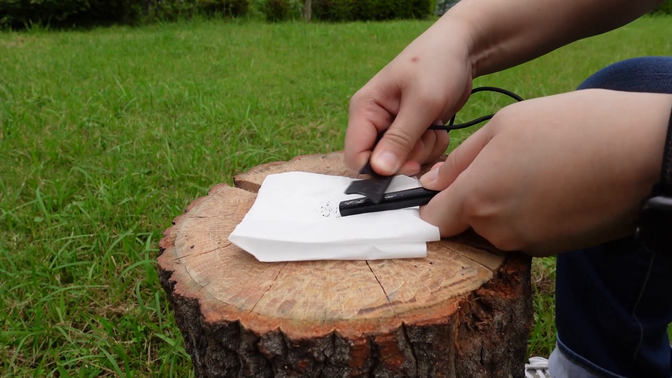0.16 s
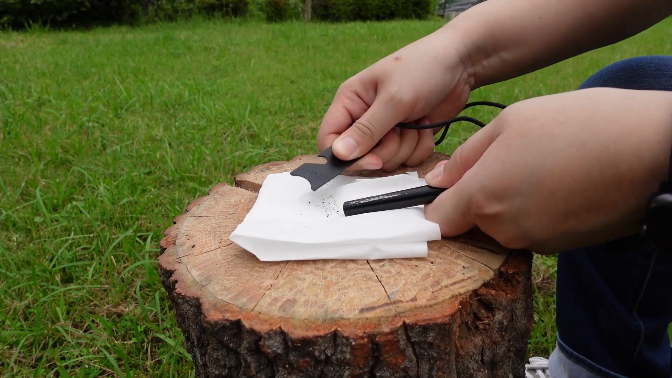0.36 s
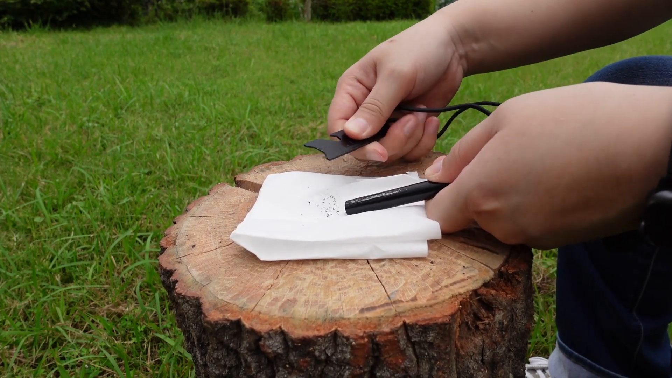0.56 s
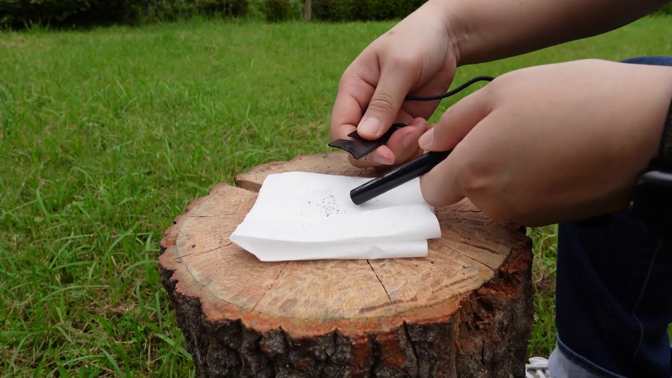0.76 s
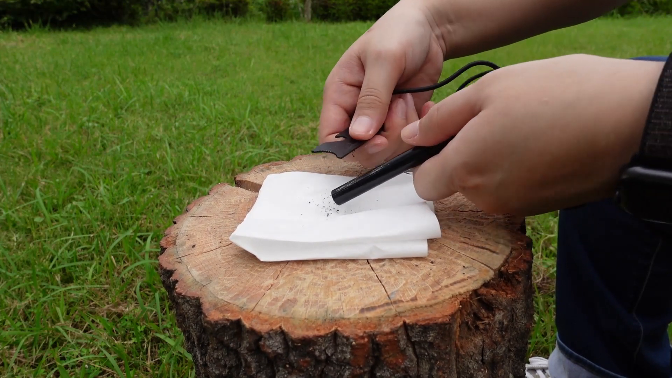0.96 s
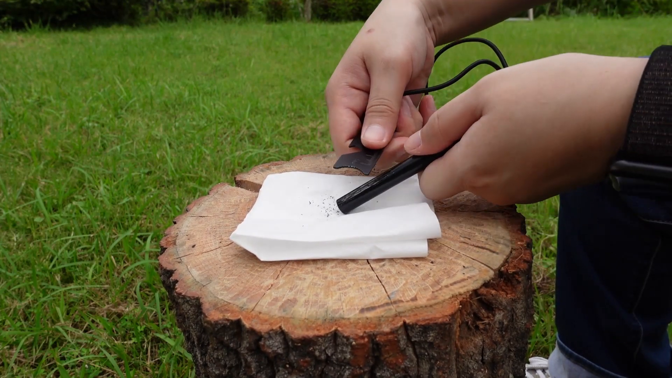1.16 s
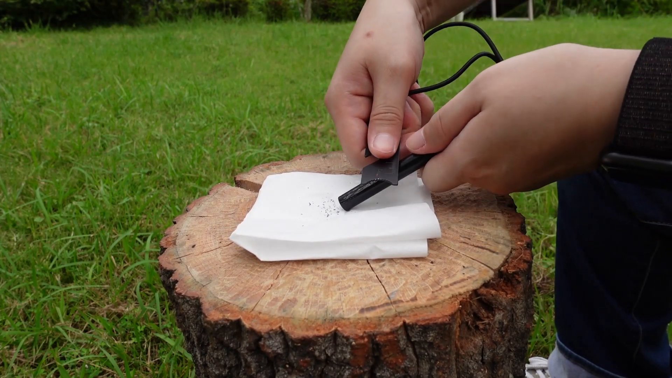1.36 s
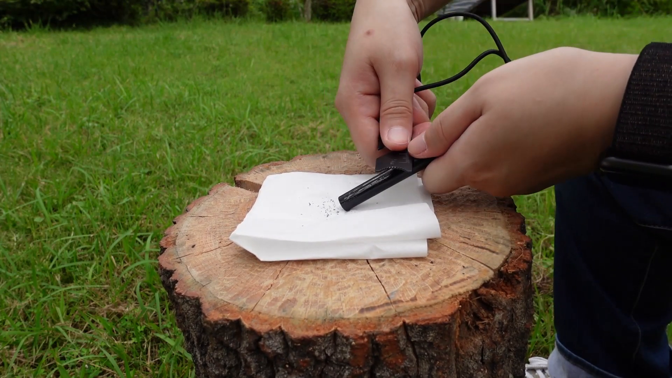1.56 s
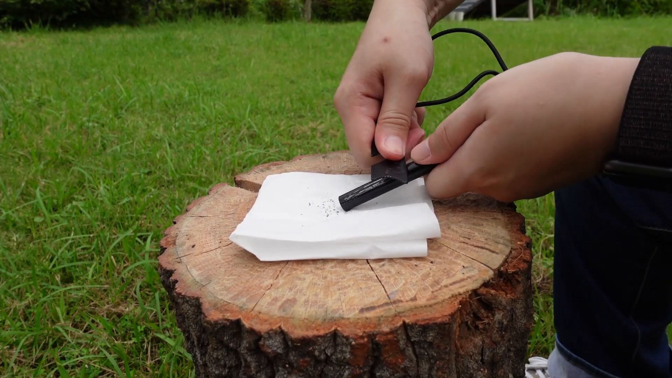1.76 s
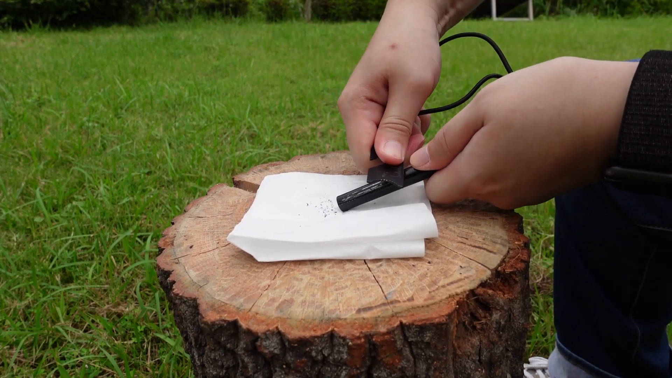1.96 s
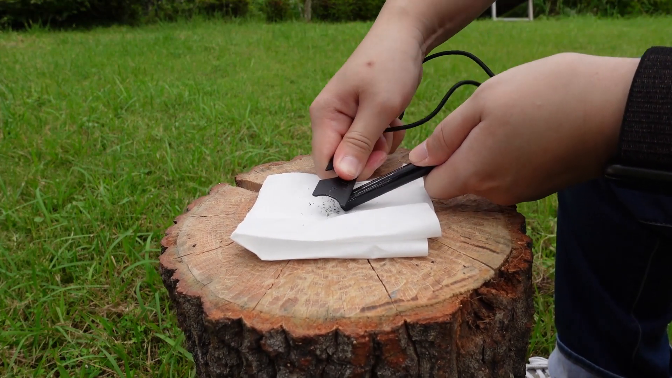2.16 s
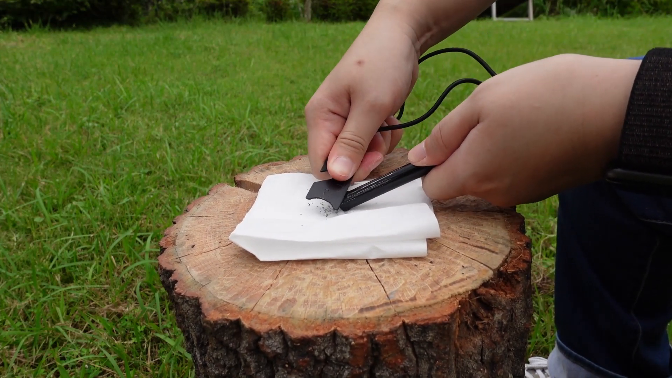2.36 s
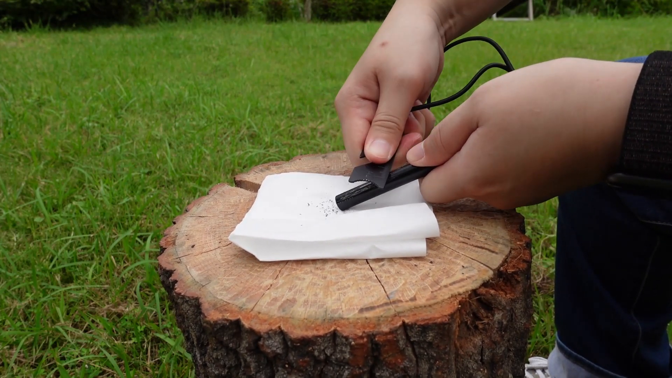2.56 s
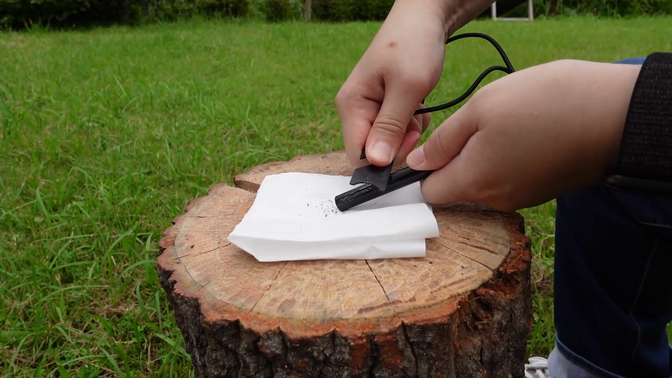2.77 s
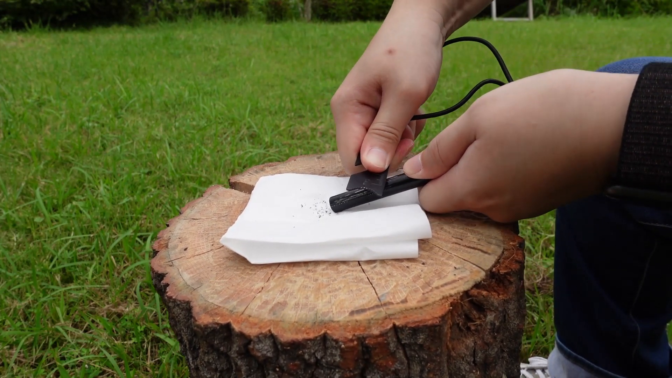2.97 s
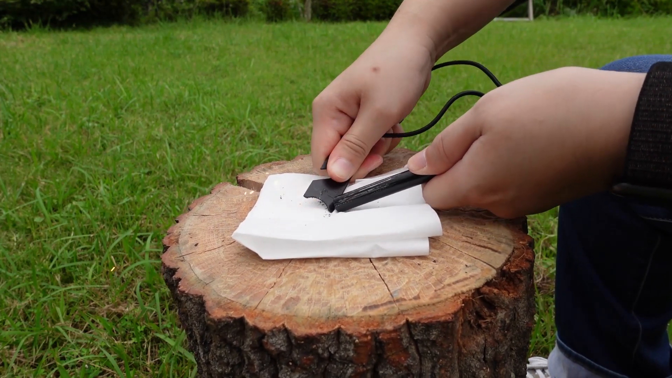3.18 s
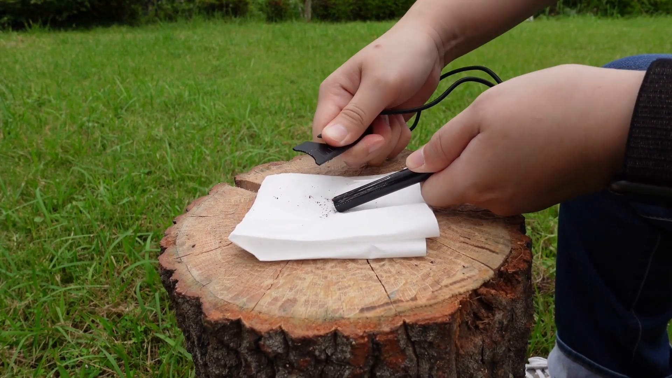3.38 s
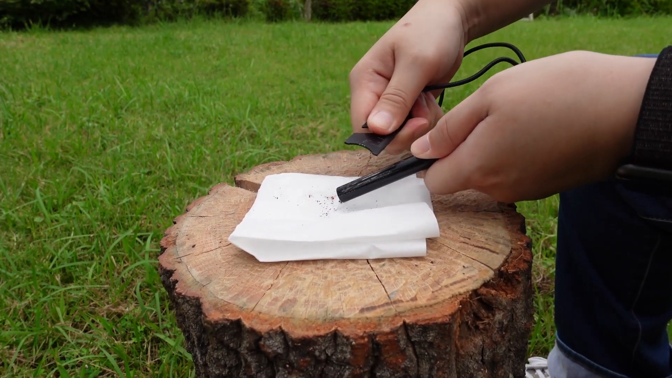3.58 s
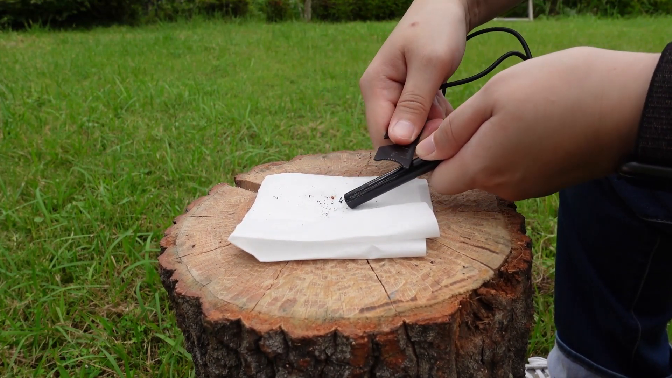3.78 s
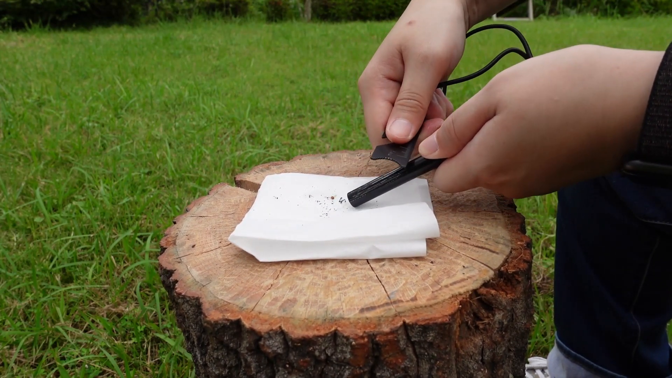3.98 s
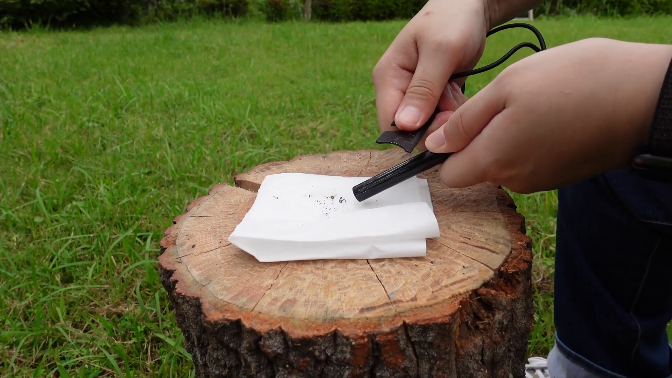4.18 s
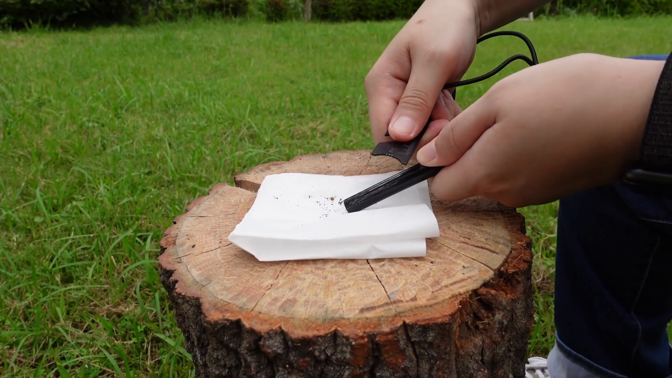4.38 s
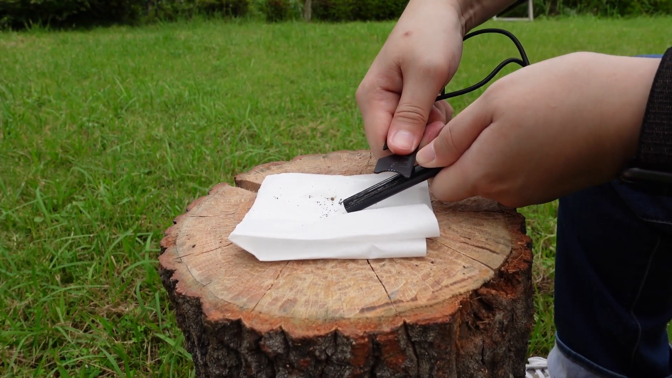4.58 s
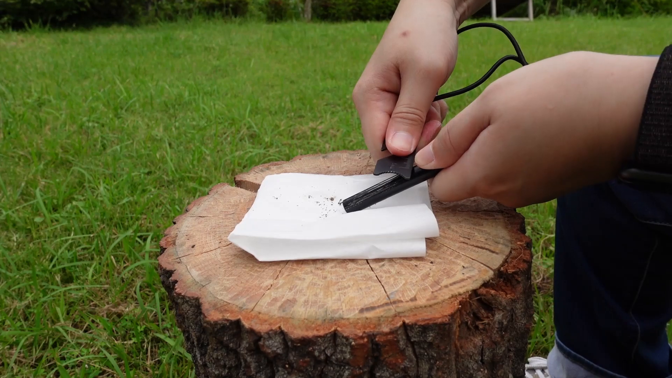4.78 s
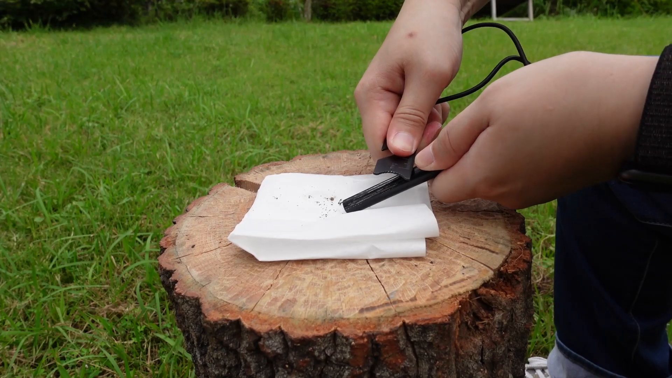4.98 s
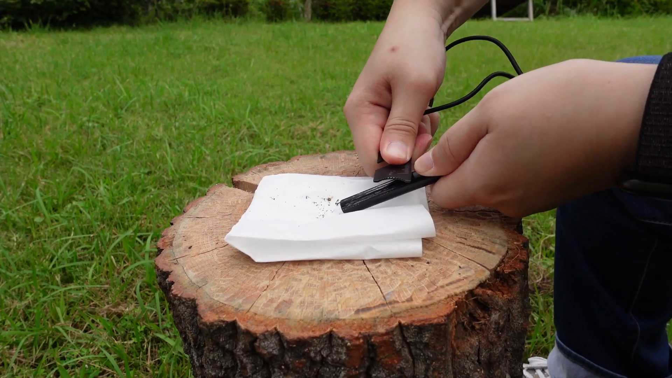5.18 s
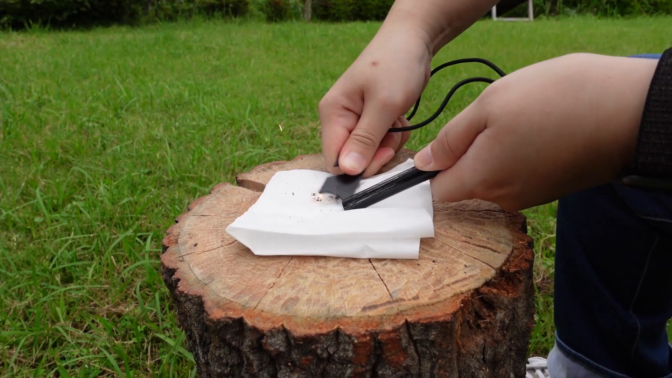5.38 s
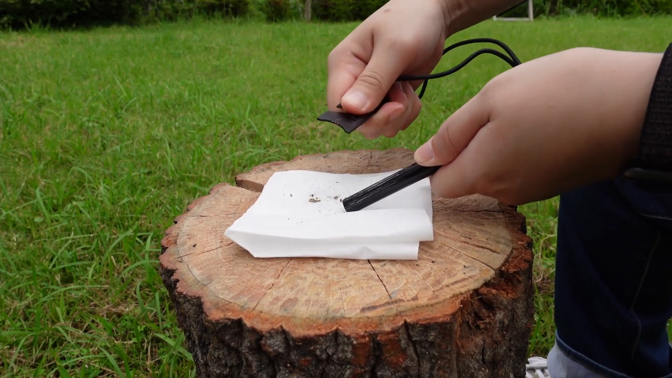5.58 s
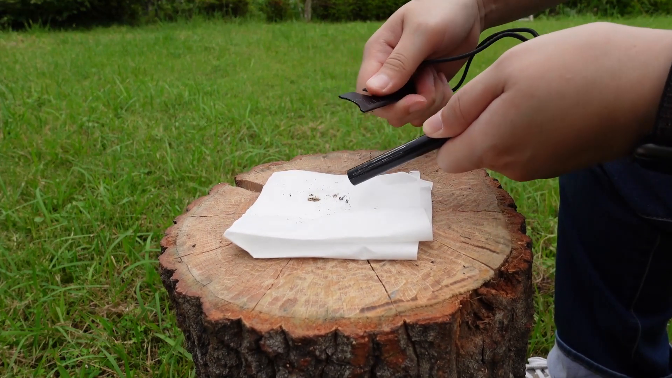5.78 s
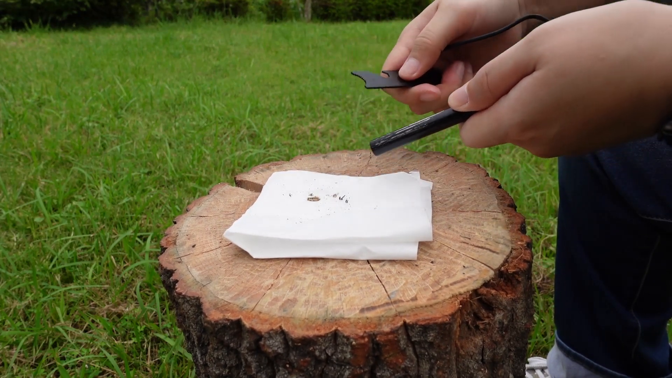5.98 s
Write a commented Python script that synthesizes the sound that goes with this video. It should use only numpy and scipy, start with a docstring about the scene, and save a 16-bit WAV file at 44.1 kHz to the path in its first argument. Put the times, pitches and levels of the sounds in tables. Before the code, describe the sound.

In an open meadow, a thin high insect drone and soft far car roar run throughout. Small birds chip at the start and again late. Near the microphone, a striker chatters brightly down a rod, pauses, clicks, scrapes in short raspy bites, crunches folded paper, taps lightly and scrapes once more. A tree stump under the paper gives soft, dull knocks. No room echo, only slight scatter from trees.

```python
"""A summer meadow: far cars, cicadas, crickets, a low hum and a buzzing katydid are there from the start.
Small birds call within the first moments; then a steel striker chatters down a fire-starter rod,
rings and taps it, crumples the paper under it and knocks the tree stump. Slower scrapes follow from 1.5 s,
light taps from 3.6 s, more bird calls from 4.4 s while the hum's octave swells, and last scrapes at 5.2 s.
Noise and uneven clicks through resonances make most of it; sliding tones make bird calls and near cricket."""
import sys
import numpy as np
from scipy import signal
from scipy.fft import rfft, irfft
from scipy.io import wavfile
from scipy.ndimage import uniform_filter1d

SR = 44100
rng = np.random.default_rng(int(sys.argv[2]) if len(sys.argv) > 2 else 0)


def generate_wav(sig):
    """Save sig (samples, or channels by samples) to the path in sys.argv[1] as 16-bit PCM at SR."""
    pcm = np.round(np.clip(np.atleast_2d(sig).T, -1, 1) * 32767).astype(np.int16)
    wavfile.write(sys.argv[1], SR, pcm)


N = 266184   # length in samples
T = np.arange(N) / SR


def amp(db):
    """Decibels to gain."""
    return 10 ** (np.asarray(db) / 20)


def rms_one(x):
    """Scale to an average strength (rms) of 1."""
    return x / np.sqrt(np.mean(x ** 2) + 1e-20)


def panned(x, db):
    """Two channels, the left louder than the right by db."""
    return np.array([x * amp(db / 2), x * amp(-db / 2)])


def drift(rate):
    """Slow random wandering with spread 1, made of straight lines between 2 * rate random points a second."""
    knots = np.arange(0, T[-1] + 1, .5 / rate)
    return rms_one(np.interp(T, knots, rng.standard_normal(len(knots))))


def swell(middle, length):
    """Rise and fall as half a cosine around a moment."""
    return np.cos(np.pi * np.clip((T - middle) / length, -.5, .5))


def curves(tables):
    """Draw the columns of several timed tables along the time axis, with a gate open only inside the tables."""
    s, *columns = np.transpose(np.vstack(tables))
    gate = 0
    for rows in tables:
        to_nearest_end = np.minimum(T - rows[0][0], rows[-1][0] - T)
        gate = gate + np.clip(to_nearest_end * 1000, 0, 1)   # opens and closes in 1 ms
    return gate, [np.interp(T, s, c) for c in columns]


def gestures(rows, rise_db):
    """Draw pushes of the hand: the gate, the level below the peak, the peak level and the other columns."""
    tables = []
    for start, rise, fall, peak_db, fade_db, *rest in rows:
        top = start + rise
        tables.append([(start, -rise_db, peak_db, *rest),
                       (top, 0, peak_db, *rest),
                       (top + fall, -fade_db, peak_db, *rest)])
    return curves(tables)


def resonate(x, hz, width_hz):
    """Ring at one pitch, as a two-pole filter with gain 1 on top; a narrow width rings longer."""
    r = np.exp(-np.pi * width_hz / SR)
    feedback = [1, -2 * r * np.cos(2 * np.pi * hz / SR), r * r]
    return signal.lfilter([(1 - r * r) / 2, 0, (r * r - 1) / 2], feedback, x + 1e-18)


def coloured(x, spectrum):
    """Shape by a (Hz, dB) spectrum with a minimum-phase filter, so that nothing sounds early."""
    hz = np.maximum(np.arange(2049) * SR / 4096, 10)
    points_hz, points_db = np.transpose(spectrum)
    log_gain = np.log(amp(np.interp(np.log(hz), np.log(points_hz), points_db)))
    cepstrum = irfft(log_gain)
    # folding the second half onto the first gives minimum phase
    cepstrum[1:2048] *= 2
    cepstrum[2049:] = 0
    impulse = irfft(np.exp(rfft(cepstrum)))
    return signal.oaconvolve(np.atleast_2d(x), impulse[None], axes=1)[:, :np.shape(x)[-1]]


def grains(per_s, spread_db):
    """Random clicks of uneven size; rms 1."""
    sizes = amp(spread_db * np.minimum(rng.exponential(1, N), 5)) * rng.choice([-1, 1], N)
    return rms_one(sizes * (rng.random(N) < per_s / SR))


# how alike left and right are: pitch_hz, likeness (0-1)
LEFT_RIGHT_LIKENESS = [(30, 0.92), (130, 0.81), (300, 0.36), (700, 0.06), (1500, 0.58), (3000, 0.5),
                       (7000, 0.23), (15000, .4)]


def wide_noise(spectrum):
    """Noise from all round, its left and right alike by a different amount at each pitch; rms 1."""
    hz, alike = np.transpose(LEFT_RIGHT_LIKENESS)
    mid, side = coloured(rng.standard_normal((2, N)), spectrum)
    mid = coloured(mid, np.transpose([hz, 10 * np.log10(1 + alike)]))[0]
    side = coloured(side, np.transpose([hz, 10 * np.log10(1 - alike)]))[0]
    return rms_one(np.array([mid + side, mid - side]))


def chorus(modes, alike, flutter_db, flutter_rate):
    """Blurred tones: fluttering noise twice through each of several resonances; rms 1."""
    mid, side = rng.standard_normal((2, N))
    noise = np.array([mid + (1 - alike) * side, mid - (1 - alike) * side])
    noise = noise * amp(flutter_db * drift(flutter_rate))
    total = 0
    for k, (hz, width_hz, db) in enumerate(modes):
        band = resonate(resonate(noise, hz, width_hz), hz, width_hz)
        total = total + amp(db) * band * (-1) ** k
    return rms_one(total)


# far cars going by: nearest_s, level_db there, passing_s (distance over speed), left_minus_right_db
CARS = [(.88, -47, 0.31, -3), (2.6, -57.5, 0.42, -1.5), (4.0, -61.5, 0.22, 3), (5.35, -59, 0.44, 4)]
# colour of the tyre roar: pitch_hz, level_db (per Hz)
TYRE_COLOUR = [(100, -27), (250, -55), (450, -14), (800, -8.5), (1200, 2), (1900, 2), (2400, -5),
               (3500, -8), (5000, -21.5), (8000, -61)]


def cars():
    """Tyre roar swells and fades with the distance of each car; the powers of the cars add up."""
    power = 0
    for nearest_s, db, passing_s, pan_db in CARS:
        distance = np.hypot(1, (T - nearest_s) / passing_s)   # 1 at the nearest point
        power = power + panned(amp(db) / distance, pan_db) ** 2
    return np.sqrt(power) * wide_noise(TYRE_COLOUR)


# loudness of the engine rumble over time: time_s, level_db
RUMBLE_LEVEL = [(0.0, -65), (3.1, -69), (4.7, -77.5), (6.04, -71)]
# colour of the engine rumble: pitch_hz, level_db (per Hz)
RUMBLE_COLOUR = [(40, -13), (100, -6), (250, -0.5), (400, -3), (700, -40)]


def engine_rumble():
    """Engine rumble of far traffic: low noise whose level follows a curve."""
    gate, (level_db,) = curves([RUMBLE_LEVEL])
    return amp(level_db) * wide_noise(RUMBLE_COLOUR)


# colour of far traffic and leaves: pitch_hz, level_db (per Hz)
MEADOW_COLOUR = [(25, -34), (60, -16.5), (150, -10.5), (400, -12.5), (700, -5.5), (1100, -4.5), (1800, -27),
                 (2500, -28.5), (4400, -16.5), (5500, -14), (7500, -22.5), (9800, -40), (11600, -22),
                 (14000, -27.5), (16000, -42)]


def meadow():
    """Far traffic and leaves as one steady bed of wide noise."""
    return amp(-62) * wide_noise(MEADOW_COLOUR)


# bands of the cicadas' song: pitch_hz, width_hz (of each filter pass), level_db (before balancing)
CICADA_BANDS = [(6463, 400, 5.5), (6858, 310, -1), (6270, 210, -4.5)]
# loudness of the cicadas over time: time_s, level_db
CICADA_LEVEL = [(0, -55.5), (6.04, -57.5)]


def cicadas():
    """A drone of many cicadas: lightly fluttering noise in narrow bands."""
    gate, (level_db,) = curves([CICADA_LEVEL])
    return amp(level_db) * chorus(CICADA_BANDS, alike=0.36, flutter_db=1.0, flutter_rate=25)


CRICKET_RATE_HZ, CRICKET_START_CYCLES = 35.7, .43   # wing beats a second; how far into a beat it starts
CRICKET_DB = -60.5   # the near cricket
# bands of the farther crickets: pitch_hz, width_hz (of each filter pass), level_db (before balancing)
FAR_CRICKET_BANDS = [(8470, 1170, -13.5), (8883, 550, -6.5)]


def crickets():
    """Each cycle has a strong and a weak wing stroke, tones that slide down; far ones blur into noise."""
    cycle = CRICKET_RATE_HZ * T + CRICKET_START_CYCLES
    strokes = 0
    # start and length as shares of a cycle, top pitch in Hz, level in dB before balancing
    for lag, length, top_hz, db in [(0, .46, 8882, 19), (.52, 0.33, 9070, -7)]:
        x = (cycle - lag) % 1 / length   # 0 to 1 within the stroke
        hz = top_hz - 550 * x
        tone = np.sin(2 * np.pi * np.cumsum(hz * (x < 1)) / SR)
        shape = np.sin(np.pi * np.minimum(x, 1)) ** 0.56
        strokes = strokes + amp(db + drift(23)) * shape * tone
    near = panned(rms_one(strokes), 2.7)
    far = amp(-0.5) * chorus(FAR_CRICKET_BANDS, alike=0.58, flutter_db=3.0, flutter_rate=74)
    return amp(CRICKET_DB) * (near + far)


HUM_PAN = amp([[-8], [3]])   # dB left, right
# the low hum: pitch_hz, width_hz (of each filter pass), level_db (before balancing)
HUM_BAND = [(621.7, 68, 0)]


def hum():
    """A low wavering hum on the right: noise in one narrow band."""
    return amp(-62) * HUM_PAN * chorus(HUM_BAND, alike=0.067, flutter_db=1.5, flutter_rate=14)


# bands of the katydid's buzz: pitch_hz, width_hz (of each filter pass), level_db (before balancing)
KATYDID_BANDS = [(11370, 660, 5), (12200, 460, -20), (11920, 900, 6)]
# single buzzes: middle_s, level_db
BUZZES = [(0.106, -68), (.37, -72), (0.622, -72), (1.003, -70), (1.23, -69), (1.469, -71), (1.721, -72),
          (1.965, -73), (2.222, -71), (2.422, -72), (2.636, -68), (2.91, -70), (3.377, -66), (3.68, -69),
          (4.08, -68.5), (4.307, -66), (4.56, -70), (5.102, -72), (5.5, -72), (5.783, -69), (5.99, -68)]
BUZZ_S, KATYDID_PULSE_HZ = 0.15, 50.5


def katydid():
    """Faint buzzes, three or four a second, of high noise pulsing about fifty times a second."""
    buzzes = sum(amp(db) * swell(middle_s, BUZZ_S) for middle_s, db in BUZZES)
    pulse = 1 + 0.24 * np.sin(2 * np.pi * KATYDID_PULSE_HZ * T)
    noise = chorus(KATYDID_BANDS, alike=.4, flutter_db=3.0, flutter_rate=100)
    return buzzes * pulse * noise * amp([[-1.2], [1.2]])


# sharp bird chips that drop onto a note: start_s, peak_db, note_hz
CHIPS = [(.033, -46.5, 9520), (0.13, -37, 8220), (4.759, -42.5, 9700), (4.861, -31.5, 8330),
         (4.994, -32.5, 8200)]
CHIP_DROP_HZ, CHIP_DROP_S = 2700, 0.00083   # starts this far above the note; falls by e in this time
CHIP_RING_S = 0.006   # loudest after half of this


def bird_chips():
    """A quick drop in pitch onto a rough note, with a short swell and fade."""
    chips, rasp = 0, np.cumsum(150 * drift(600)) / SR   # the pitch shakes by 150 Hz
    for start_s, peak_db, note_hz in CHIPS:
        age = np.maximum(T - start_s, 0)
        drop = CHIP_DROP_HZ * CHIP_DROP_S * np.exp(-age / CHIP_DROP_S)
        tone = np.sin(2 * np.pi * (note_hz * age - drop + rasp))
        shape = 2 * (age / CHIP_RING_S) * np.exp(1 - 2 * age / CHIP_RING_S)
        chips = chips + amp(peak_db) * tone * shape
    return panned(chips, 0.34)


# bird whistles: level_db, tremble_hz (spread of the shaking pitch), pitch curve as points of (time_s, pitch_hz)
WHISTLES = [(-57, 100, [(.035, 3600), (.06, 5000), (.085, 5700)]), (-59, 80, [(.13, 5200), (.155, 3300)]),
            (-66, 67, [(.95, 4400), (.975, 4500), (.995, 4000)]), (-60, 41, [(1.015, 4100), (1.03, 4500),
            (1.045, 4000)]), (-57, 27, [(1.668, 5300), (1.675, 4700), (1.705, 4850), (1.718, 4080),
            (1.74, 4050), (1.752, 4750), (1.775, 4800)]), (-57.5, 40, [(1.893, 5500), (1.918, 3950),
            (1.926, 4250), (1.938, 3900), (1.968, 3650)]), (-62.5, 33, [(4.415, 3400), (4.46, 3750),
            (4.48, 3300)]), (-61, 120, [(4.692, 3400), (4.705, 4700), (4.725, 5100)]),
            (-69, 250, [(4.728, 5100), (4.75, 5300), (4.78, 5000)]), (-64, 110, [(4.783, 5000),
            (4.81, 3700)])]
WHISTLE_EDGE_S = .006   # softens starts and ends


def bird_whistles():
    """Gliding tones along a drawn pitch curve, with a trembling pitch and level."""
    tables = [[(*point, db, tremble_hz) for point in pitch] for db, tremble_hz, pitch in WHISTLES]
    gate, (hz, db, tremble_hz) = curves(tables)
    soft_gate = uniform_filter1d(gate, size=round(WHISTLE_EDGE_S * SR))
    tone = np.sin(2 * np.pi * np.cumsum(hz + tremble_hz * drift(700)) / SR)
    return panned(np.sqrt(2) * soft_gate * amp(db + 1.6 * drift(150)) * tone, 0.44)


TREE_ECHO_DB, TREE_ECHO_S = -3, .022   # the echoes fall by e in this time


def birds():
    """Rough chips and trembling whistles, smeared by scattered echoes from the trees."""
    calls = bird_chips() + bird_whistles()
    fade = np.exp(-np.arange(6000) / SR / TREE_ECHO_S)
    trees = rng.standard_normal((2, 6000)) * fade / np.sqrt(TREE_ECHO_S * SR / 2)
    return calls + amp(TREE_ECHO_DB) * signal.oaconvolve(calls, trees, axes=1)[:, :N]


# what rod and striker ring with: pitch_hz, width_hz (before each use reshapes it), level_db (taps use half)
MODES = [(780, 180, 6), (1626, 210, 16.5), (2770, 840, -18), (3067, 200, 3.5), (3300, 91, -11.5),
         (3780, 960, -9), (4065, 330, -4.5), (4780, 97, -5), (4430, 380, 1.5), (4775, 246, -2),
         (5580, 350, 0.5), (5850, 184, 3.5), (5992, 87, -2), (6270, 170, 6), (6320, 660, 11),
         (8580, 740, -2.5)]


def near_chatter(hz, chatter_hz, spread):
    """Modes near the chatter rate of the edge and its octave are driven hardest; far ones keep a small share."""
    first = -6 * (np.log2(hz / chatter_hz) / spread) ** 2
    octave = -12 - 6 * (np.log2(hz / chatter_hz / 2) / 0.18) ** 2
    return amp(np.maximum(np.maximum(first, octave), -36))


# strokes of the edge along the rod, one row per bite: start_s, rise_s, fall_s, ring_db,
# fade_db (over the fall; negative grows), chatter_hz, spread_octaves, grit_db
STROKES = [(0.203, 0.0041, 0.0095, -15.5, 5.5, 6300, 0.24, -51),
           (0.216, .001, 0.014, -26, -4, 5800, 0.15, -52),
           (0.227, 0.0081, 0.00867, -23, -1, 6060, .18, -48),
           (0.243, 0.0071, 0.0066, -18, 18, 6200, 0.26, -43),
           (0.255, 0.0063, 0.0036, -21.5, 9, 6300, .22, -47),
           (0.266, .004, 0.0062, -19.5, 11, 5860, 0.16, -47),
           (0.276, 0.0025, 0.0068, -20, 10, 6100, 0.19, -48), (0.288, .005, .006, -23, 28, 6050, .23, -40),
           (1.515, 0.019, 0.028, -50, 1, 3620, 0.2, -82), (1.77, .012, .023, -34, 25, 4180, 0.2, -54),
           (2.139, .028, .031, -18.5, 3.5, 4295, 0.34, -35),
           (2.199, 0.00058, 0.032, -34, 23, 4160, .38, -48),
           (2.325, 0.007, 0.038, -50.5, 11, 3480, 0.54, -67),
           (2.579, 0.0008, 0.043, -29, 26, 3870, 0.24, -56),
           (3.069, 0.0058, 0.0331, -21, 2.5, 4500, 0.31, -36.5),
           (3.115, .001, 0.0069, -21, 24, 3160, 0.49, -41),
           (3.123, 0.00087, 0.065, -36.5, 9, 3600, 0.26, -58),
           (5.24, 0.007, 0.018, -24.5, 0.5, 5030, 0.34, -34.5),
           (5.266, 0.0011, 0.019, -21.5, 3, 5180, 0.48, -30.5),
           (5.339, 0.0067, .005, -27, 17, 3600, 0.27, -54), (5.436, .002, 0.01, -25, 2, 3620, 0.48, -53)]
BITE_RISE_DB = 12   # a bite swells by this much
# colour of the torn-off grit: pitch_hz, level_db (per Hz)
GRIT_COLOUR = [(1000, -17.5), (4000, 1), (6500, 0), (8700, 10.5), (10300, -1), (12500, 3.5), (14300, -2),
               (15200, -2), (16000, -45)]


def scrape():
    """Dense uneven slips drive the modes of the steel; torn-off grit adds a bright hiss."""
    gate, columns = gestures(STROKES, BITE_RISE_DB)
    live = uniform_filter1d(gate, size=3001) > 1e-6   # only the strokes and their short tails
    shape_db, ring_db, chatter_hz, spread, grit_db = (c[live] for c in columns)
    slips = (grains(9000, spread_db=2.2) * amp(1.8 * drift(300)) * gate)[live]
    rings, power = 0, 0
    leans = rng.standard_normal(len(MODES))   # each mode beams its own way
    for k, ((hz, width_hz, db), lean) in enumerate(zip(MODES, leans)):
        gain = amp(db) * near_chatter(hz, chatter_hz, spread)
        # the second, wider filter steepens the skirts
        ring = resonate(resonate(slips, hz, width_hz), hz, 2.36 * width_hz)
        ring = ring * np.sqrt(SR / np.pi / width_hz)   # evens out narrow and wide modes
        rings = rings + panned(gain * ring * (-1) ** k, -3 + 4.3 * lean)
        power = power + gain ** 2
    hiss = 0.54 * gate[live] * rng.standard_normal((2, live.sum()))
    grit = coloured(slips + hiss, GRIT_COLOUR)
    out = np.zeros((2, N))
    out[:, live] = amp(shape_db) * (amp(ring_db) * rings / np.sqrt(power) + amp(grit_db) * grit)
    return out


# folds of the paper snapping: start_s, peak_db (before panning), pitch_hz
SNAPS = [(0.294, -29, 1850), (0.306, -46, 1770), (3.138, -23, 2660), (3.172, -23, 1700),
         (3.187, -27.5, 1160), (3.19, -22, 1680), (3.206, -21.5, 1520), (3.214, -28, 2680),
         (3.244, -30, 3500), (3.254, -31, 2560), (3.27, -32.5, 3220), (3.29, -36, 3280), (3.338, -46, 1270),
         (5.301, -27, 2770), (5.31, -25, 2820), (5.316, -26, 2860), (5.326, -28, 3080), (5.354, -30, 2800),
         (5.3705, -16, 2610), (5.384, -35, 2970), (5.397, -17, 1120), (5.405, -39, 1670)]
SNAP_S, SNAP_TREBLE_DB = 0.0011, -44   # all fall by e in this time and aim at this treble


def snaps():
    """A short noise burst where a fold gives; all have like treble, so big folds mainly add body."""
    out, t = np.zeros(N), np.arange(1500) / SR
    for start_s, peak_db, hz in SNAPS:
        burst = rng.standard_normal(1500) * np.exp(-t / SNAP_S) * np.minimum(t / 0.0003, 1)
        treble_db = SNAP_TREBLE_DB - peak_db
        colour = [(60, -60), (250, -27), (hz / 2, -10), (hz, 0), (hz * 2.24, -8),
                  (9000, treble_db), (16000, treble_db - 20)]
        snap = coloured(burst, colour)[0]
        at = round(start_s * SR)
        out[at:at + len(t)] += amp(peak_db) * snap / np.abs(snap).max()
    return out


# paper crumpling under the rod's tip, one row per push: start_s, rise_s, fall_s, level_db,
# fade_db (over the fall; negative grows), brightness_db
PAPER = [(.24, 0.0011, 0.038, -54, -3, 6.5), (.287, .007, 0.024, -50, 19, 5),
         (.313, .001, 0.14, -67.5, 2, 12), (2.14, 0.0067, 0.074, -50.5, 0.5, 5),
         (3.09, 0.0049, 0.052, -35.5, 1, 1.5), (3.139, .001, .04, -36.5, 10.5, 3),
         (3.18, 0.0056, 0.034, -41.5, -1.5, -4), (3.226, .001, 0.57, -48.5, 32, -1),
         (5.263, 0.0022, 0.0257, -41.5, 3, 4.5), (5.289, .001, 0.046, -44.5, 3, 6),
         (5.336, 0.039, 0.0226, -37.5, 3.5, 4), (5.393, 0.0041, 0.013, -39, 11, 7),
         (5.411, .001, 0.053, -48, 2, -4)]
PUSH_RISE_DB = 13.5   # a push swells by this much
# colour of the rustle: pitch_hz, level_db (per Hz)
PAPER_COLOUR = [(60, -50), (250, -9), (500, -6), (1100, 3.5), (1700, 4), (3000, -0.5), (6000, -2.5),
                (10000, -11.5), (15000, -21)]


def paper():
    """A dense rustle of clicks and noise from the folded paper, with louder snaps where a fold gives."""
    gate, (shape_db, level_db, bright_db) = gestures(PAPER, PUSH_RISE_DB)
    fine = grains(12000, spread_db=2.0) + .5 * rng.standard_normal((2, N))
    rustle = rms_one(coloured(fine * amp(4.0 * drift(120)), PAPER_COLOUR))
    dull = signal.sosfilt(signal.butter(2, 2600, fs=SR, output="sos"), rustle)
    bright = amp(bright_db) * (rustle - dull)
    crumple = gate * amp(level_db + shape_db) * (dull + bright)
    return (crumple + snaps()) * amp([[-.8], [.8]])


# knocks through the stump: start_s, level_db (before rise and fade), pitch_hz, t60_s (time to fall 60 dB)
KNOCKS = [(.25, -38, 747, 0.045), (0.64, -45.5, 96, 0.2), (1.549, -33.5, 353, 0.021)]


def knocks():
    """Soft damped thumps of the wood: low tones that rise briefly and die away."""
    out = 0
    for start_s, db, hz, t60 in KNOCKS:
        age = np.maximum(T - start_s, 0)
        rise = np.minimum(8 * age / t60, 1)
        out = out + amp(db - 60 * age / t60) * np.sin(2 * np.pi * hz * age) * rise
    return panned(out, .5)


# taps and slips of steel on the rod: start_s, peak_db (before panning), chatter_hz, ring_share (0-1), brightness_db
TAPS = [(0.2884, -24, 5890, 0.3, -12), (0.2925, -10.5, 5960, 0.67, -6), (1.287, -12.5, 3260, 0.58, -6),
        (1.607, -41.5, 3700, .7, -26), (1.7724, -30, 4600, 0.9, -21), (1.987, -45, 4200, .8, -9),
        (2.077, -41, 4670, 1, -17), (2.1064, -39, 4520, 0.7, 5), (2.5811, -20.5, 3920, 0.8, -22),
        (2.8354, -49, 4950, 0.2, -23), (3.0733, -35, 4760, 0, -7), (3.1102, -9, 5900, .45, -4),
        (3.113, -10, 2990, 1, -13), (3.12, -24, 2620, 0.5, -2), (3.595, -33.5, 2600, 0.38, -1),
        (3.7196, -27.5, 3500, 0.06, 0), (3.7528, -33, 3500, 0.03, 6), (3.7863, -31.5, 4520, 0.3, -4.5),
        (3.8236, -22, 3280, 0.3, 3), (3.8502, -40, 4710, 0.4, 0), (3.8914, -28.5, 3500, 0, -1),
        (3.9437, -39.5, 3420, 0.1, 8), (3.953, -42, 5950, 0.2, -3), (4.4897, -18, 4750, 0.54, -1),
        (5.2839, -6.5, 3005, 0.44, -25), (5.344, -20, 3190, 0.3, -19)]
TAP_SPREAD_OCTAVES, TAP_PAN_DB, TAP_PAN_SCATTER_DB = 0.32, -3, 4
# colour of a tap's crack: pitch_hz, level_db (per Hz)
CRACK_COLOUR = [(100, -66), (600, -21), (1800, -7.5), (5000, 2)]
# treble of the crack, to which the brightness is added: pitch_hz, level_db (per Hz)
CRACK_TREBLE = [(12000, -6), (14500, -16), (16000, -14)]


def taps():
    """Each tap is a short crack plus the modes near its pitch, damped by the fingers."""
    out, t = np.zeros((2, N + 2000)), np.arange(2000) / SR
    for start_s, peak_db, chatter_hz, share, bright_db in TAPS:
        ring = 0
        for (hz, width_hz, db), luck in zip(MODES, rng.standard_normal(len(MODES))):
            # luck shifts both the level and the phase
            gain = amp(.5 * db + luck) * near_chatter(hz, chatter_hz, TAP_SPREAD_OCTAVES)
            fade = np.exp(-1.2 * np.pi * width_hz * t)
            ring = ring + gain * np.sin(2 * np.pi * hz * t + np.pi * luck) * fade
        ring = ring * np.minimum(t / 0.00043, 1)
        treble = [(hz, db + bright_db) for hz, db in CRACK_TREBLE]
        burst = rng.standard_normal(len(t)) * np.exp(-t / 0.0011)
        crack = coloured(burst, CRACK_COLOUR + treble)[0]
        tap = share * ring / np.abs(ring).max() + (1 - share) * crack / np.abs(crack).max()
        tap = amp(peak_db) * tap / np.abs(tap).max()
        at = round(start_s * SR)
        pan_db = TAP_PAN_DB + TAP_PAN_SCATTER_DB * rng.standard_normal()
        out[:, at:at + len(t)] += panned(tap, pan_db)
    return out[:, :N]


# about an octave above the hum: pitch_hz, width_hz (of each filter pass), level_db (before balancing)
OVERTONE_BAND = [(1253, 42, 0)]
OVERTONE_DB, OVERTONE_MIDDLE_S, OVERTONE_LASTS_S = -64, 4.97, 1


def hum_overtone():
    """The hum's octave, noise in one narrow band, swells once."""
    tone = chorus(OVERTONE_BAND, alike=0.62, flutter_db=0.5, flutter_rate=3.38)
    return amp(OVERTONE_DB) * swell(OVERTONE_MIDDLE_S, OVERTONE_LASTS_S) * tone * HUM_PAN


def scene():
    """Hands near, the meadow all round."""
    background = cars() + engine_rumble() + meadow()
    animals = cicadas() + crickets() + katydid() + birds()
    hands = scrape() + paper() + knocks() + taps()
    return background + animals + hands + hum() + hum_overtone()


CUTOFF_HZ = 15800


def record(dry):
    """The microphone drops the deep bass; the top is cut steeply."""
    thin = signal.sosfilt(signal.butter(2, 70, "high", fs=SR, output="sos"), dry)
    return signal.sosfilt(signal.cheby2(12, 70, CUTOFF_HZ + 500, fs=SR, output="sos"), thin)


dry = scene()
out = record(dry)
generate_wav(out)
```